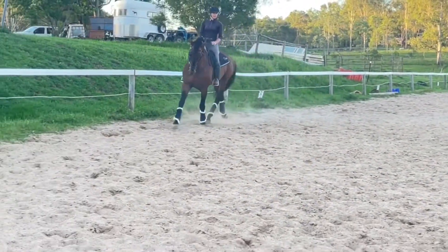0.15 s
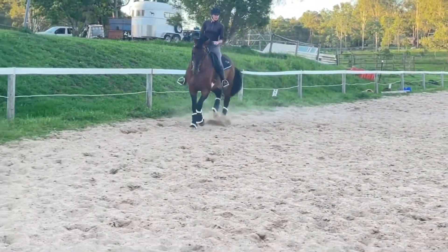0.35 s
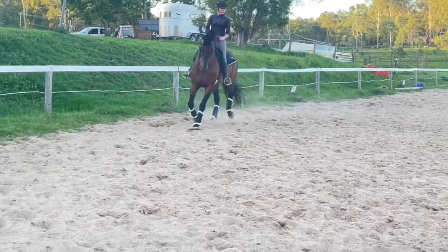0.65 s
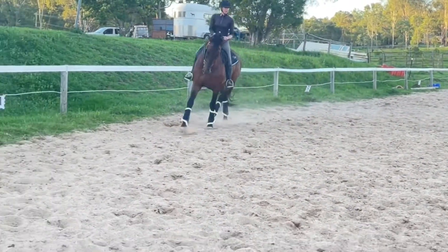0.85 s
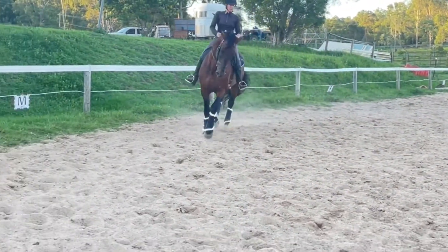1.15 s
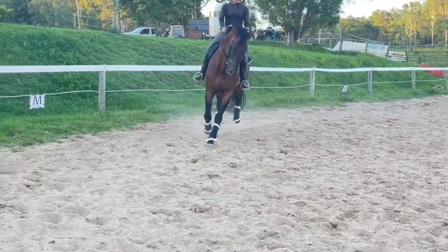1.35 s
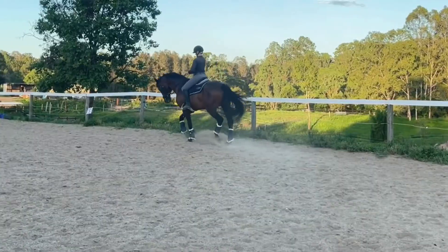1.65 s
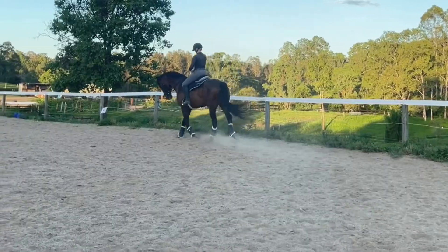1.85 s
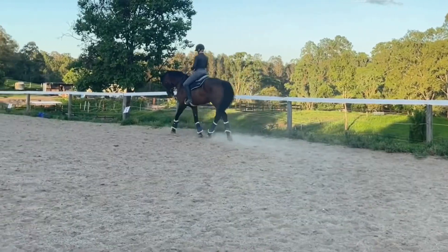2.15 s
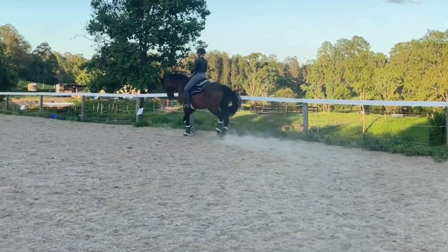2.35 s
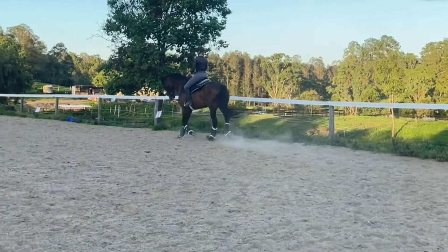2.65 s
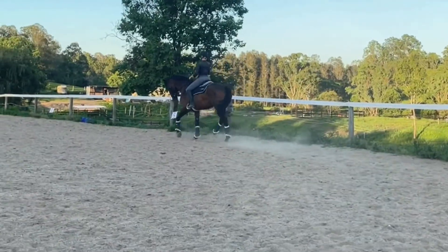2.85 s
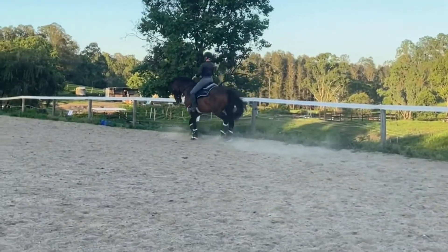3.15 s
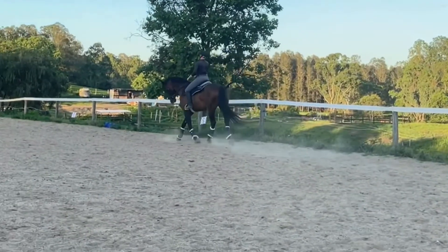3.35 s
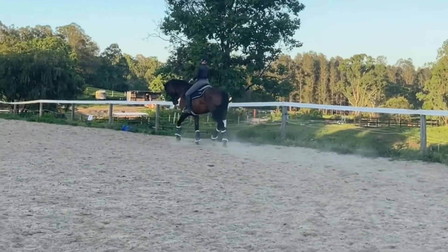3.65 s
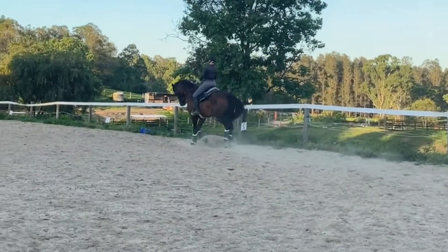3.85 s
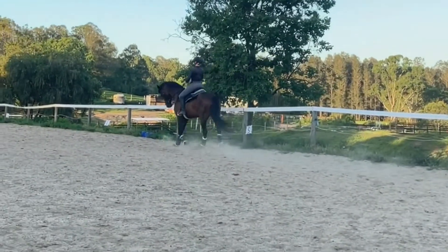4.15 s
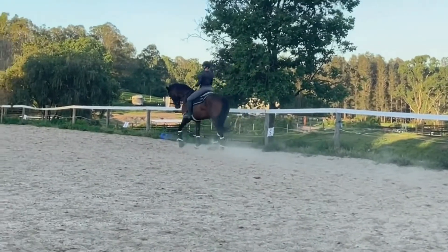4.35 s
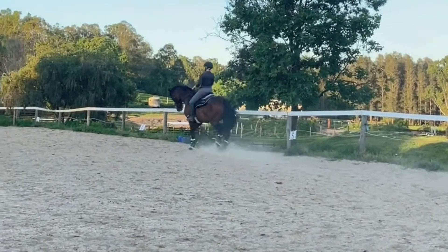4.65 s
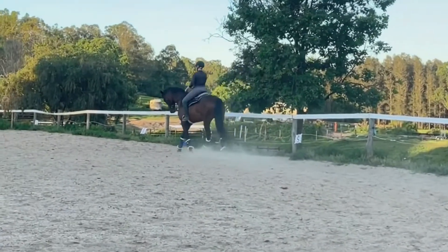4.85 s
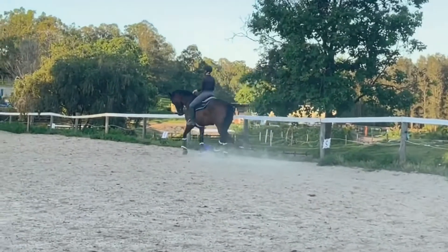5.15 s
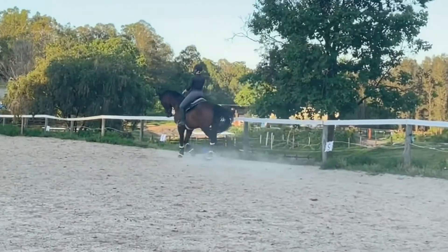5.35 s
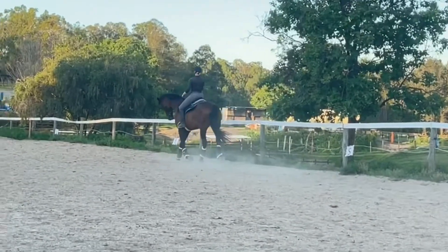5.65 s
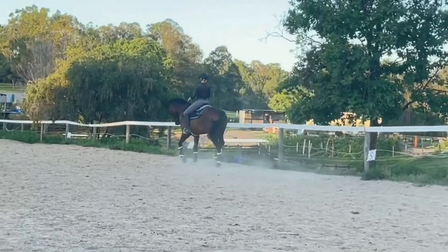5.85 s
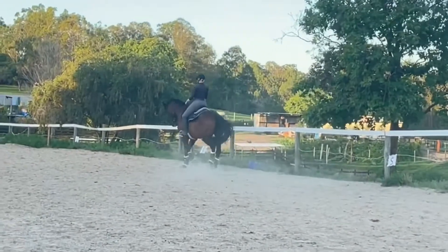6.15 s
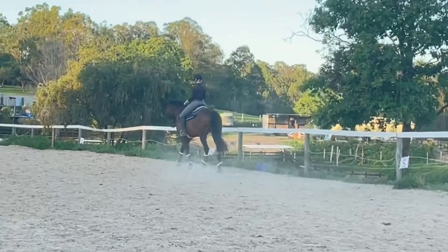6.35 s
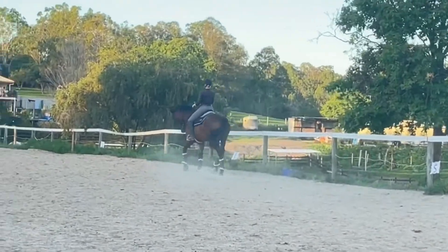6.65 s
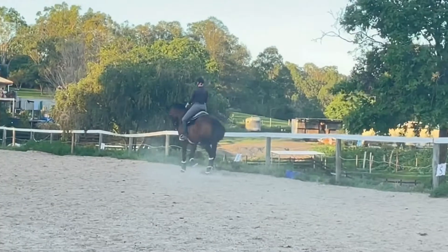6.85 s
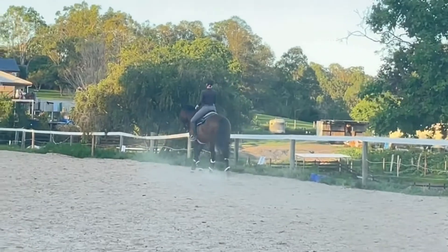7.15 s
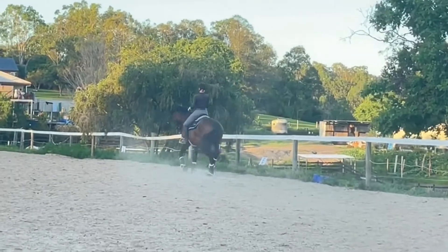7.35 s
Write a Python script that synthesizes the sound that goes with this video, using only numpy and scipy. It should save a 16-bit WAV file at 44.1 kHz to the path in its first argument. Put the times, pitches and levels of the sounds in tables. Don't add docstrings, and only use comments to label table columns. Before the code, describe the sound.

Low wind rumble and flutter swelling over a microphone, a steady cricket trill, faint hoof scuffs in sand and tiny bright ticks outdoors.

```python
import sys
import numpy as np
from scipy import signal
from scipy.fft import rfft, irfft, next_fast_len
from scipy.io import wavfile
from scipy.ndimage import uniform_filter1d, map_coordinates

SR = 44100
rng = np.random.default_rng(int(sys.argv[2]) if len(sys.argv) > 2 else 0)


def invert_db(level):
    return 10 ** (np.asarray(level, dtype=float) / 20)


def wav_out(sig):
    wavfile.write(sys.argv[1], SR, np.round(np.clip(np.atleast_2d(sig).T, -1, 1) * 32767).astype(np.int16))


N = 330292


def unit(x):
    return x / np.sqrt(np.mean(x ** 2) + 1e-20)


def along(points, hz):
    point_hz, value = np.transpose(points)
    return np.interp(np.log(hz + 1), np.log(point_hz + 1), value)


def curves(rows):
    knot_s, *columns = np.transpose(rows)
    return [np.interp(np.arange(N) / SR, knot_s, column) for column in columns]


def wobble(rate_hz):
    knots = rng.standard_normal(int(N * 60 / SR) + 9)
    return map_coordinates(knots, [np.arange(N) * min(rate_hz, 60) / SR])


def filtered(x, response):
    size = next_fast_len(N + SR // 2)
    return irfft(rfft(x, size) * response(np.fft.rfftfreq(size, 1 / SR)), size)[:N]


def resonance(hz, center_hz, width_hz):
    damping = 1j * hz * width_hz
    return damping / (center_hz * center_hz - hz * hz + damping)


def rush(response, patchy_db):
    spectrum = signal.stft(rng.standard_normal(N), nperseg=512)[2]
    patches = uniform_filter1d(rng.standard_normal(spectrum.shape), size=6, axis=0)
    patches = uniform_filter1d(patches, size=14, axis=1)
    noise = signal.istft(spectrum * invert_db(patchy_db * unit(patches)), nperseg=512)[1][:N]
    return unit(filtered(noise, response))


def steady(x, size):
    return unit(x / np.sqrt(np.abs(uniform_filter1d(x * x, size)) + 0.11))


def add(track, start_s, sound):
    part = track[max(round(start_s * SR), 0):][:len(sound)]
    part += sound[:len(part)]


def phase(hz):
    return 2 * np.pi * np.cumsum(hz) / SR


def trees(x, t60_s):
    t = np.arange(SR // 2) / SR
    tail = rng.standard_normal(len(t)) * invert_db(-60 * t / t60_s)
    return signal.fftconvolve(x, tail / np.linalg.norm(tail))[:N]


def wind():
    # start_s, rumble_db, flutter_db
    puffs = [(0.056, -57, -74), (0.13, -60.0, -78), (0.338, -59, -76), (0.398, -56.5, -79),
             (0.58, -57.5, -76), (0.648, -75, -69), (0.749, -58, -77), (0.839, -75, -66),
             (0.909, -53, -67.0), (1.052, -61.0, -66), (1.107, -57, -73), (1.154, -57.5, -79),
             (1.256, -57.5, -56), (1.378, -53, -62.5), (1.477, -43.5, -62), (1.59, -44, -53.5),
             (1.699, -47.5, -71), (1.805, -73, -70), (1.87, -46.5, -81), (1.983, -40.5, -58),
             (2.024, -51, -69), (2.137, -52.0, -69), (2.183, -49, -77), (2.272, -49, -77),
             (2.321, -41.5, -60.5), (2.435, -54.0, -80), (2.524, -50, -79), (2.565, -48, -68),
             (2.704, -53.5, -64), (2.76, -75, -70), (2.796, -70, -66.0), (2.836, -55, -66.5),
             (2.879, -51.0, -78), (2.914, -52.0, -74), (3.001, -70, -66), (3.058, -52.5, -81),
             (3.114, -63, -81), (3.159, -64, -54), (3.201, -53.0, -80), (3.255, -58, -74),
             (3.394, -60, -62), (3.471, -56.5, -73.0), (3.54, -63, -55.5), (3.598, -39.5, -38),
             (3.685, -37.5, -63), (3.785, -71, -60), (3.824, -64, -62.5), (3.894, -45.5, -76),
             (3.987, -45, -64.0), (4.037, -56, -68), (4.085, -50, -64), (4.126, -35.5, -58),
             (4.291, -37, -54), (4.351, -51, -64), (4.402, -42, -46.5), (4.46, -35.5, -57),
             (4.534, -36, -45), (4.594, -36.5, -39), (4.644, -38.5, -46.5), (4.717, -38, -44),
             (4.777, -32.5, -38), (4.823, -43, -43.5), (4.89, -31.5, -37.5), (4.986, -45, -56),
             (5.03, -37, -35), (5.079, -38.0, -50), (5.113, -54, -66), (5.149, -36, -40.5),
             (5.212, -36, -41), (5.25, -31, -43), (5.336, -37, -58), (5.437, -32, -42),
             (5.481, -37.5, -43.5), (5.523, -35, -42.5), (5.561, -47, -40.5), (5.61, -41, -59),
             (5.676, -31.5, -34.5), (5.785, -31, -37.5), (5.859, -39.5, -51), (5.966, -33.5, -40.5),
             (6.018, -38, -33.5), (6.08, -28, -34), (6.155, -35.5, -38.5), (6.191, -52, -49.5),
             (6.268, -38, -38), (6.352, -31.5, -44.0), (6.461, -38.0, -45), (6.499, -41.5, -52),
             (6.559, -31, -27.5), (6.617, -44, -49), (6.659, -38, -62), (6.711, -32.5, -56),
             (6.786, -35.5, -41.5), (6.831, -33, -44.5), (6.927, -39.5, -39), (7.045, -46.5, -72),
             (7.084, -41.5, -60), (7.236, -56, -60), (7.282, -47, -64), (7.345, -42.5, -70)]
    # freq_hz, density_db (per Hz)
    rumble = [(12, -49.5), (20, -14), (45, 4.5), (64, 7), (129, -7.5), (160, -15.5), (210, -37.5),
              (350, -120)]
    flutter = [(60, -40), (110, 4.5), (180, -4), (260, -17), (400, -35.5), (700, -46.5), (1200, -120)]
    hard_edge = [(150, -61), (260, 5.5), (400, -7.5), (700, -44.5), (1200, -120)]

    t = np.arange(-SR // 4, SR // 4) / SR
    lump = lambda width_s: np.exp(-(t / width_s) ** 2)
    slow, fast = np.zeros((2, N + SR // 2))
    for start_s, rumble_db, flutter_db in puffs:
        slow_lump = lump(0.0086) + invert_db(-18) * lump(0.057)
        fast_lump = lump(0.0085) + invert_db(-30.5) * lump(0.038)
        add(slow, start_s - .012, invert_db(2 * rumble_db - 4.5) * slow_lump)
        add(fast, start_s - .013, invert_db(2 * flutter_db - 0.5) * fast_lump)
    slow = slow[SR // 4:][:N]
    fast = fast[SR // 4:][:N]

    low = steady(rush(lambda hz: invert_db(along(rumble, hz)), patchy_db=2.5), size=1100)
    high = steady(rush(lambda hz: invert_db(along(flutter, hz)), patchy_db=4.5), size=500)
    edge = steady(rush(lambda hz: invert_db(along(hard_edge, hz)), patchy_db=0.0), size=300)
    air = np.sqrt(slow + invert_db(-140)) * low + np.sqrt(fast + invert_db(-150)) * high
    air = air + invert_db(4.5) * fast ** 0.82 * edge

    def port(hz):
        late = np.exp(-2j * np.pi * .8 * np.log(hz + 20))
        return late / (1 + (hz / 600) ** 6) / (1 + (32 / (hz + 1)) ** 4)
    return filtered(air, port)


def cricket():
    # start_s, level_db
    wing_strokes = [(0.061, -74), (0.091, -76), (0.123, -75.5), (0.277, -76), (0.304, -75), (0.337, -85),
                    (0.357, -77.0), (0.527, -80), (0.569, -78), (0.622, -73), (0.666, -72.5), (0.71, -70),
                    (0.764, -73), (0.805, -73), (0.841, -72.0), (0.87, -76.5), (0.9, -76), (0.927, -73.5),
                    (0.955, -75), (0.984, -73), (1.011, -74), (1.042, -77.5), (1.145, -74), (1.172, -80),
                    (1.202, -78), (1.229, -72.5), (1.257, -80), (1.285, -72), (1.314, -80), (1.477, -74),
                    (1.51, -77), (1.534, -76), (1.565, -73), (1.592, -69.5), (1.752, -69), (1.778, -77),
                    (1.808, -72), (1.848, -70.5), (1.881, -73), (1.937, -71), (1.985, -66.5),
                    (2.038, -65.5), (2.082, -68), (2.167, -71), (2.193, -71), (2.222, -68.5), (2.256, -68),
                    (2.284, -70), (2.311, -67.5), (2.342, -66), (2.453, -70), (2.478, -70.5), (2.507, -72),
                    (2.535, -69), (2.565, -67), (2.591, -69.5), (2.618, -66), (2.648, -69), (2.678, -87),
                    (2.733, -74), (2.766, -64.5), (2.797, -67), (2.827, -68.5), (2.88, -66), (2.909, -67),
                    (2.971, -77), (3.025, -70.5), (3.047, -70), (3.067, -72), (3.098, -68), (3.12, -70),
                    (3.154, -67.0), (3.184, -69), (3.297, -70), (3.325, -67.5), (3.358, -69), (3.39, -65.5),
                    (3.498, -83), (3.52, -67.5), (3.557, -70.5), (3.608, -65.5), (3.655, -67.5),
                    (3.703, -65.5), (3.752, -65), (3.818, -66), (3.848, -70), (3.876, -67.5), (3.908, -65),
                    (3.935, -66), (3.962, -63.5), (3.991, -69.5), (4.097, -68), (4.124, -66.5),
                    (4.154, -70.5), (4.183, -66), (4.213, -69), (4.239, -65), (4.36, -67.5), (4.386, -68.5),
                    (4.415, -73), (4.442, -67.5), (4.471, -68), (4.501, -66.5), (4.528, -70), (4.575, -77),
                    (4.642, -67.5), (4.67, -66), (4.7, -69), (4.725, -70), (4.756, -67), (4.784, -65.5),
                    (4.906, -66), (4.934, -65.5), (4.963, -66.5), (4.994, -69.5), (5.022, -66.5),
                    (5.117, -74.5), (5.147, -70), (5.178, -68.5), (5.219, -68.5), (5.27, -63.5),
                    (5.322, -65.5), (5.365, -66.5), (5.411, -65), (5.455, -67.5), (5.483, -67),
                    (5.511, -64.5), (5.54, -67), (5.568, -66.5), (5.597, -69.5), (5.683, -68), (5.715, -66),
                    (5.741, -69), (5.769, -67), (5.797, -65.5), (5.826, -67.5), (5.854, -67.5),
                    (5.882, -67), (5.918, -65.5), (6.025, -67.5), (6.055, -68), (6.084, -66.5), (6.11, -68),
                    (6.138, -68), (6.165, -68), (6.194, -68), (6.302, -70), (6.329, -67), (6.36, -68),
                    (6.387, -67.0), (6.419, -64.5), (6.449, -64), (6.561, -67), (6.593, -66.5),
                    (6.622, -67.5), (6.652, -72), (6.684, -67), (6.815, -68.5), (6.846, -69),
                    (6.876, -66.5), (6.913, -72), (6.964, -66), (7.014, -68.5), (7.063, -67.5),
                    (7.112, -64), (7.182, -70.5), (7.211, -66.5), (7.245, -66), (7.273, -65.5),
                    (7.301, -67.5), (7.328, -66.5), (7.357, -65), (7.383, -68.5), (7.413, -66), (7.46, -89)]
    # multiple, level_db
    wing = [(1, 2.5), (2, -19), (3, -23.5), (4, -40)]

    song, stroke_swells = np.zeros((2, N))
    gaps_s = np.diff(np.transpose(wing_strokes)[0], prepend=-1, append=9)
    lengths_s = np.clip(0.66 * np.minimum(gaps_s[:-1], gaps_s[1:]), .012, .033)
    draws = rng.standard_normal((len(wing_strokes), 2))
    for (start_s, db), length_s, (detune, sag) in zip(wing_strokes, lengths_s, draws):
        u = np.linspace(0, 1, round(length_s * SR))
        fall_hz = np.clip(255 + 110 * sag, -30, 360)
        turn = phase(3845 + .25 * fall_hz + 15 * detune - fall_hz * u ** 1.6)
        tone = sum(invert_db(level_db) * np.sin(multiple * turn) for multiple, level_db in wing)
        swell = invert_db(db + 1.5) * np.abs(np.sin(np.pi * u ** 1.45)) ** .55
        add(song, start_s - .003, swell * tone)
        add(stroke_swells, start_s - .003, swell)

    bright_spectrum = [(3000, -120), (4500, 2.5), (9000, -5), (15000, -3.5)]
    bright_noise = rush(lambda hz: invert_db(along(bright_spectrum, hz)), patchy_db=5.5)
    song = song * invert_db(2.5 * wobble(55)) + invert_db(-19) * uniform_filter1d(stroke_swells, size=600) * bright_noise
    return song + invert_db(-13) * trees(song, t60_s=0.17)


def horse():
    # start_s, peak_db, length_s
    hooves = [
        (0.452, -69, 0.017),
        (0.466, -64, 0.018),
        (0.509, -71.5, 0.021),
        (1.206, -66, 0.042),
        (1.264, -69.5, 0.015),
        (1.645, -70, 0.027),
        (1.743, -75, 0.025),
        (3.139, -73.5, 0.018),
    ]
    # center_hz, width_hz, level_db
    sand = [(1060, 167, 5.5), (2000, 1600, -14), (350, 450, -2)]
    # start_s, peak_db, body_db (dull part re peak)
    ticks = [(0.0413, -68, -23), (0.2426, -76.5, -1), (0.273, -65, -19), (0.2818, -58.5, -26),
             (0.2855, -62, -18), (0.337, -70, -20), (0.3671, -71, -20), (0.7208, -76, -13),
             (0.7368, -66.5, -14), (0.8182, -68.5, -4), (0.9425, -60.5, -16), (1.035, -59, -30),
             (1.104, -68, -20), (1.5552, -65, -14), (1.953, -63.5, -14), (2.728, -68, -6), (3.04, -69, -7),
             (3.1383, -59, -13), (3.1417, -64, -15), (3.1484, -56.5, -21), (3.518, -61, -23),
             (4.2063, -70, -9), (5.1322, -71.5, -3), (5.167, -83, 14.5), (5.931, -83, 0),
             (6.198, -66.5, -16), (6.319, -64, -8), (6.706, -86, -1), (7.078, -76.5, 8.5),
             (7.2694, -71, -16), (7.4642, -85, 11)]

    scuffs, bright, dull = np.zeros((3, N))
    for start_s, db, length_s in hooves:
        u = np.linspace(0, 1, max(round(length_s * SR), 9))
        add(scuffs, start_s, invert_db(db + 9) * np.abs(np.sin(np.pi * u)) ** 1.5)

    t = np.arange(SR // 40) / SR
    grains = rng.standard_normal((len(ticks), len(t)))
    for (start_s, db, body_db), grit in zip(ticks, grains):
        add(bright, start_s, invert_db(db + 1) * grit * np.exp(-t / .0017))
        add(dull, start_s, invert_db(db + body_db + 16) * grit * np.exp(-t / 0.0043))

    def sand_body(hz):
        return sum((-1) ** k * invert_db(db) * resonance(hz, center_hz, width_hz)
                   for k, (center_hz, width_hz, db) in enumerate(sand))
    scuffing = filtered(scuffs * rng.standard_normal(N), sand_body)
    ticking = filtered(bright, lambda hz: resonance(hz, 8000, 9000))
    thudding = filtered(dull, lambda hz: resonance(hz, 2100, 1300))
    return scuffing + ticking + thudding


def birds():
    # start_s, length_s, start_hz, middle_hz, end_hz, level_db
    whistles = [(1.077, 0.031, 2930, 2980, 3150, -86.5), (1.098, 0.11, 3250, 3230, 3370, -85),
                (1.185, 0.049, 3250, 3080, 2650, -89), (1.278, 0.039, 1790, 2050, 1880, -85),
                (1.765, 0.032, 2360, 2370, 2430, -88), (1.826, 0.028, 2180, 2260, 2130, -83.5),
                (1.882, 0.024, 1840, 1740, 1620, -86), (1.964, .045, 1890, 2000, 1890, -85),
                (2.548, 0.024, 5800, 5800, 5700, -85), (3.255, 0.024, 2750, 2740, 2840, -79),
                (3.342, .11, 3500, 2230, 1660, -80), (3.385, 0.046, 4850, 5300, 5000, -88),
                (3.467, .03, 2250, 2570, 2750, -76.5), (3.481, 0.035, 2500, 3300, 3600, -71),
                (3.583, .03, 4830, 4370, 4570, -75), (3.743, 0.033, 3160, 3160, 3360, -75.5),
                (3.955, 0.047, 3670, 3200, 2460, -75), (4.112, .07, 5600, 5600, 5900, -93),
                (4.236, 0.069, 5820, 5700, 5700, -90.5), (4.22, 0.18, 2500, 2430, 2400, -91.5),
                (4.58, 0.12, 2720, 2850, 3020, -91), (5.276, 0.1, 1690, 1730, 2000, -87),
                (5.315, 0.054, 4150, 4360, 4480, -91), (2.672, 0.034, 4120, 3980, 4000, -81.5),
                (5.703, .115, 2500, 2400, 1720, -83), (6.117, 0.16, 1800, 1770, 1750, -89.5),
                (6.656, 0.13, 3000, 2150, 1520, -81.5), (6.905, .06, 5600, 5570, 5500, -99)]

    song = np.zeros(N)
    for start_s, length_s, start_hz, middle_hz, end_hz, db in whistles:
        u = np.linspace(0, 1, round(length_s * SR))
        glide = np.polyfit([0, .5, 1], [start_hz, middle_hz, end_hz], deg=2)
        turn = phase(np.polyval(glide, u))
        overtone_db = -7 if start_s < 1.25 else -32
        throb_depth = .9 if start_s > 6.6 else .1
        throb = 1 + throb_depth * np.sin(2 * np.pi * 165 * length_s * u)
        shape = np.abs(np.sin(np.pi * u)) ** 0.4 * throb
        tone = np.sin(turn) + invert_db(overtone_db) * np.sin(2 * turn)
        add(song, start_s, invert_db(db + 9) * shape * tone)
    song = song * invert_db(1.6 * wobble(45))
    return song + invert_db(-13) * trees(song, t60_s=.2)


def far_cricket():
    t = np.arange(N) / SR
    beats = np.abs(np.sin(np.pi * 33 * t + 1.5 * wobble(5))) ** 2 * invert_db(5 * wobble(6))
    song = invert_db(-85.5) * beats * np.sin(phase(3860 + 60 * wobble(30)))
    return song + invert_db(-4) * trees(song, t60_s=0.37)


def hush():
    # time_s, low_db, high_db
    swells = [(0.0, -80, -88), (0.87, -80.5, -89.5), (1.44, -78, -85), (1.67, -77, -83.5),
              (2.82, -77.5, -85), (5.07, -77.5, -87), (5.74, -78.5, -85.5), (6.63, -80, -87.5),
              (7.49, -76, -86.5)]
    # freq_hz, density_db (per Hz)
    field = [(88, -29), (150, -4), (278, -12), (567, -10.5), (866, -13), (1380, -32), (2310, -41.5),
             (3030, -43.5), (3400, -44), (11500, -62), (14200, -61.5), (15000, -58)]

    low_db, high_db = curves(swells)
    upper = lambda hz: 1 / (1 + (1700 / (hz + 1)) ** 4)
    low = rush(lambda hz: invert_db(along(field, hz)) * (1 - upper(hz)), patchy_db=1.46)
    high = rush(lambda hz: invert_db(along(field, hz)) * upper(hz), patchy_db=1.17)
    low_gain = invert_db(low_db + 2 + 0.22 * wobble(2.8))
    high_gain = invert_db(high_db + 9.5 + 1.34 * wobble(6.6))
    return low_gain * low + high_gain * high


def scene():
    return (wind() + cricket() + horse() + birds() + far_cricket() + hush())[None]


def roll_off(x):
    return signal.sosfilt(signal.butter(12, 16020, fs=SR, output="sos"), x)


def record(dry):
    # time_s, level_db
    whine_levels = [(0, -88), (4.53, -85.5), (4.56, -110), (4.63, -110), (4.66, -92), (5.02, -81),
                    (5.05, -115), (5.3, -100), (5.38, -86), (5.96, -84), (5.99, -110), (6.25, -81),
                    (6.61, -85), (6.64, -110), (6.79, -115), (6.82, -85), (7.02, -79), (7.06, -99),
                    (7.42, -102), (7.45, -86)]
    # start_s, end_s
    mute_start_s, mute_end_s = (1.372, 1.4095)

    t = np.arange(N) / SR
    beat = 2 * np.pi * 11.1 * (t - .545)
    whine_db = curves(whine_levels)[0]
    throb = 1 + .45 * np.cos(beat) + .5 * np.cos(2 * beat) + .2 * np.cos(3 * beat)
    throb = throb * invert_db(3 * wobble(45) - 2.5)
    whine = invert_db(whine_db) * throb * np.sin(2 * np.pi * 15609 * t + 1.1 * wobble(40))

    top = filtered(dry[0], lambda hz: 1 / (1 + (14300 / (hz + 1)) ** 24))
    top_gain = invert_db(.6 * (whine_db + 85) + 4 * wobble(30))
    thinned = dry[0] + top * (top_gain - 1)
    kept = filtered(thinned, lambda hz: 1 / (1 + (hz / 15500) ** 60))
    open_gate = np.clip(np.maximum(mute_start_s - t, t - mute_end_s) / .0012, 0, 1)
    return roll_off(((kept + whine) * open_gate)[None])


dry = scene()
out = record(dry)
wav_out(out)
```